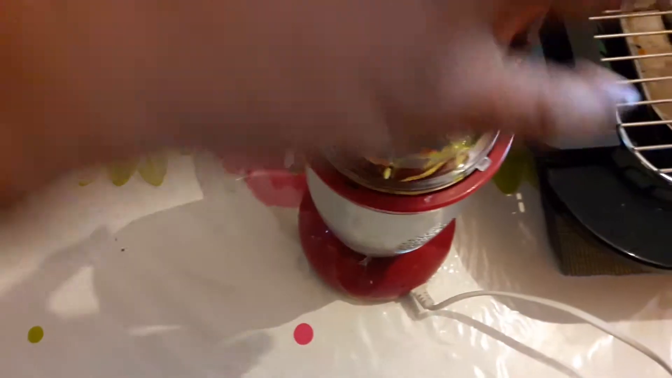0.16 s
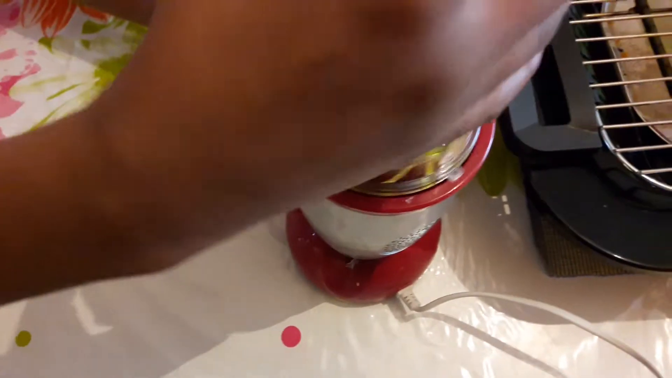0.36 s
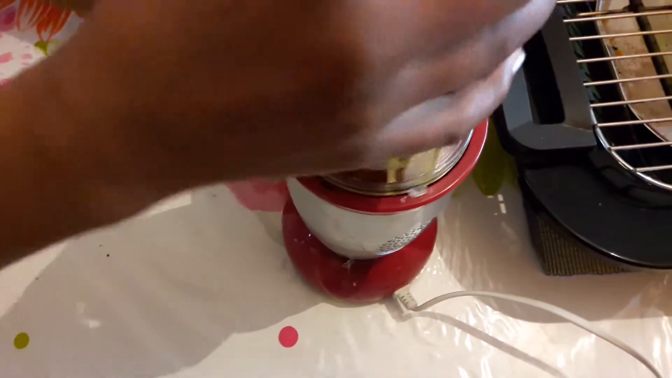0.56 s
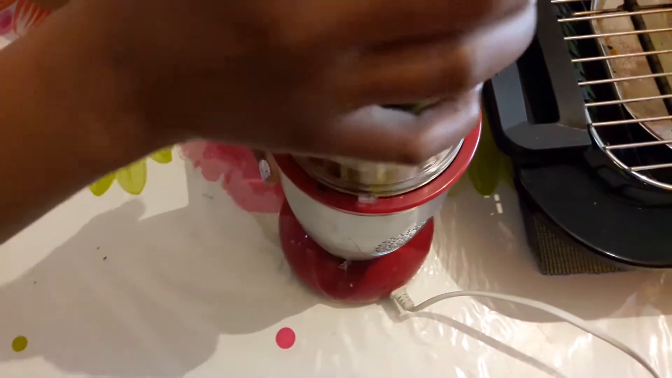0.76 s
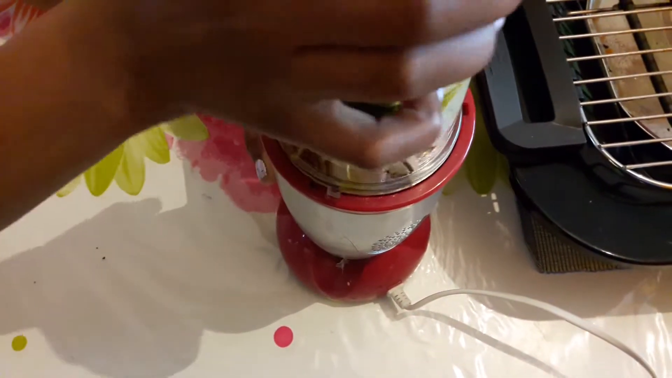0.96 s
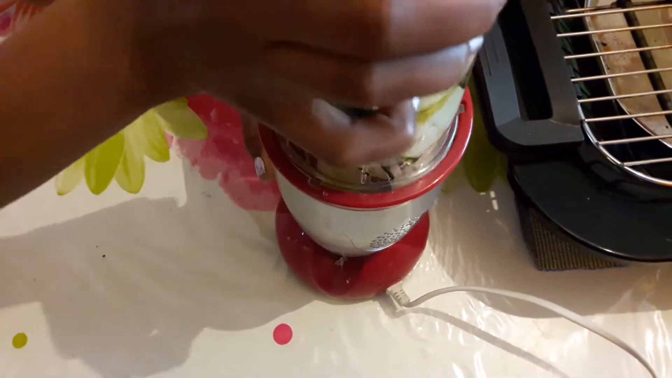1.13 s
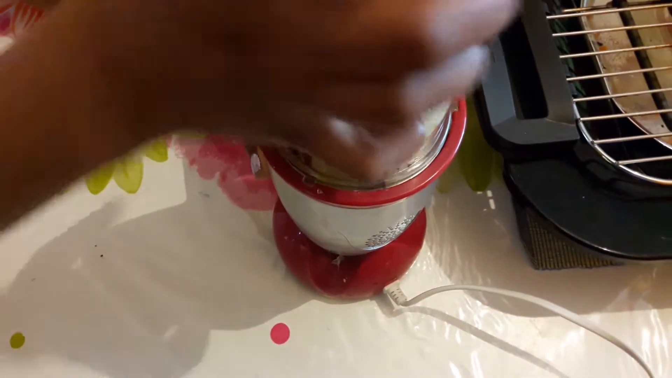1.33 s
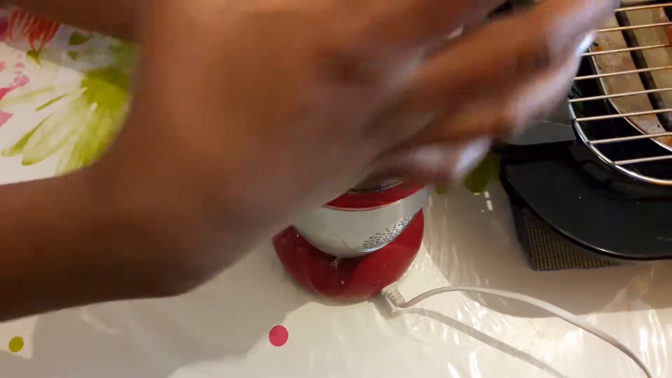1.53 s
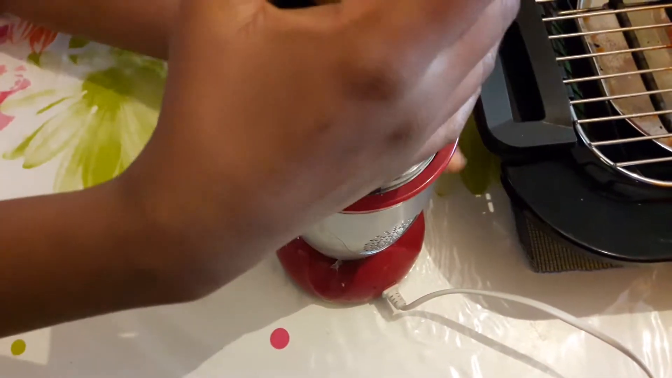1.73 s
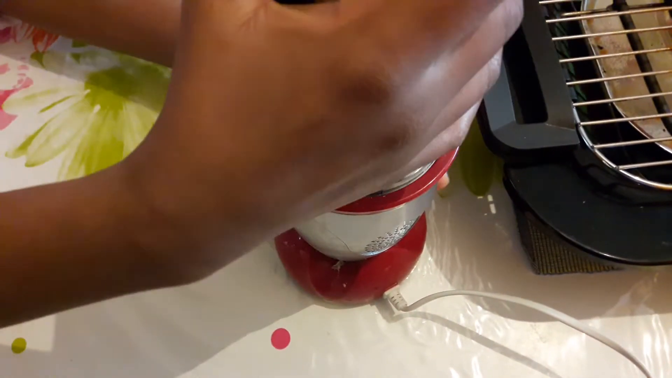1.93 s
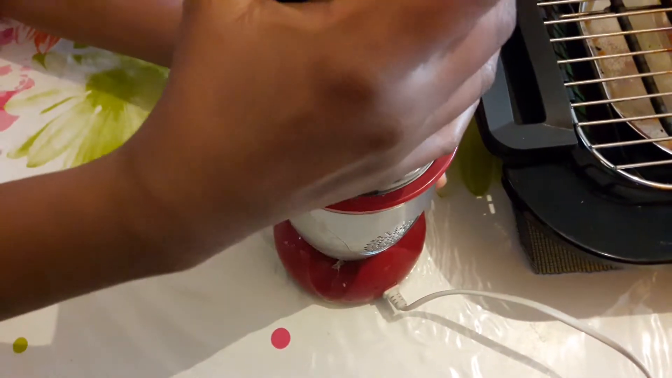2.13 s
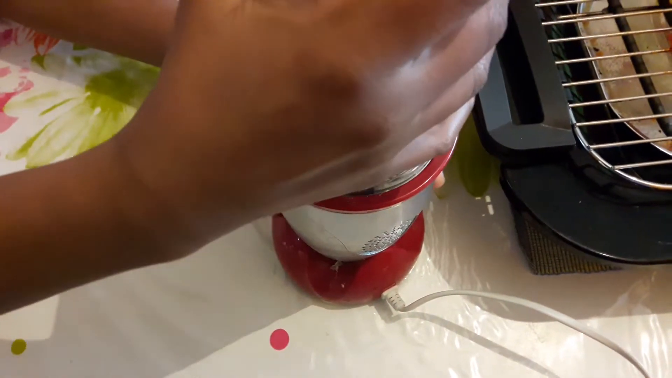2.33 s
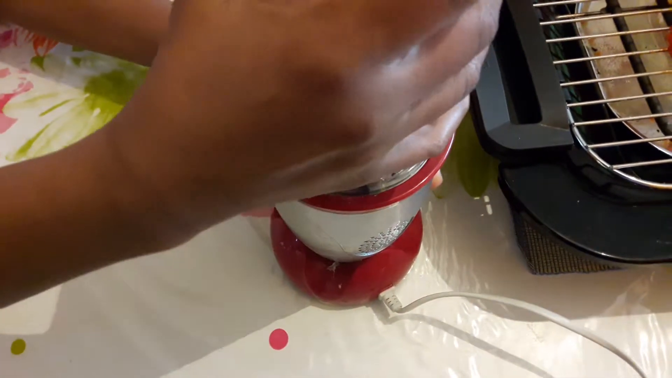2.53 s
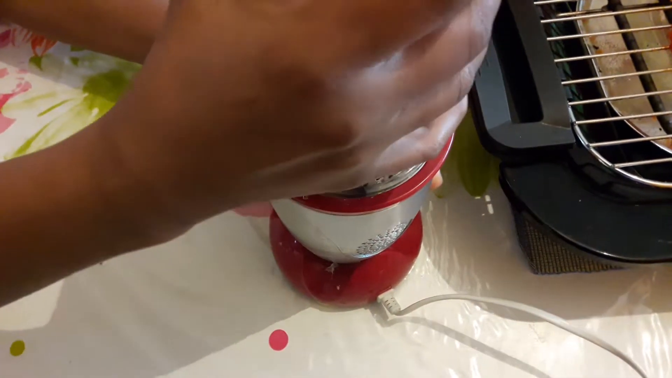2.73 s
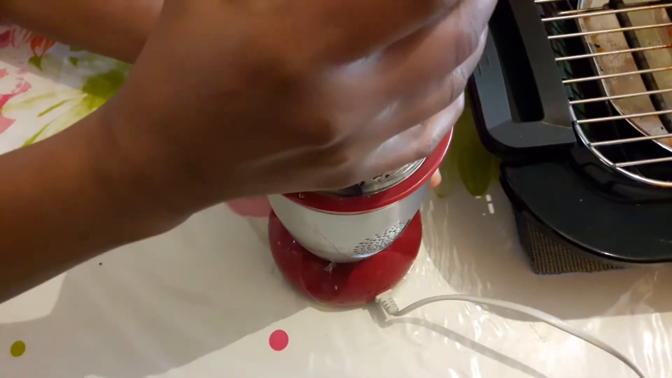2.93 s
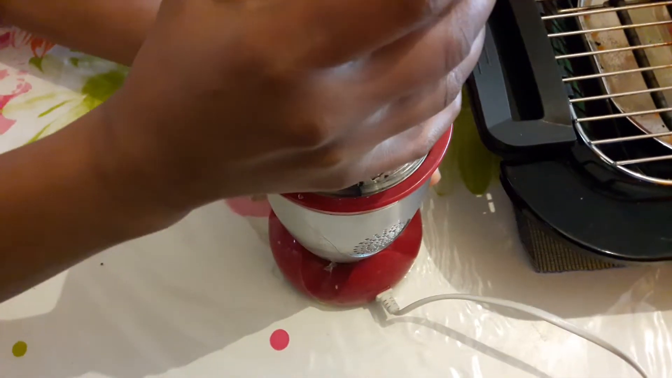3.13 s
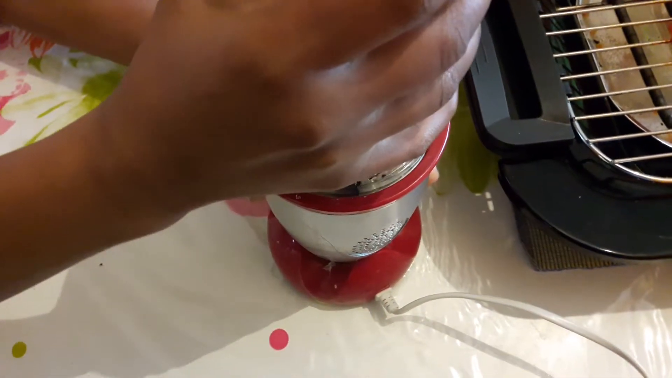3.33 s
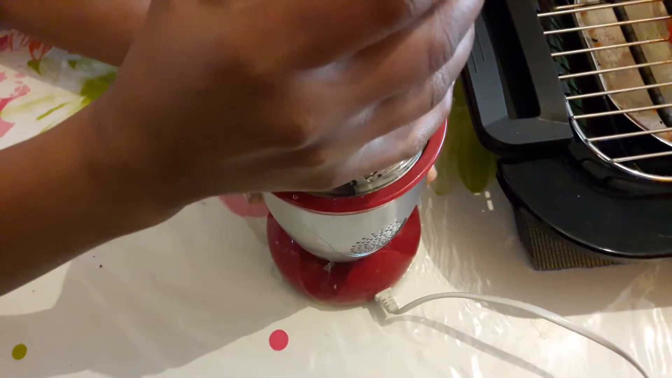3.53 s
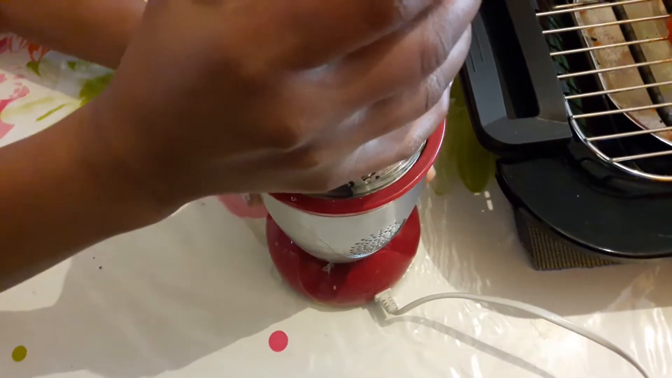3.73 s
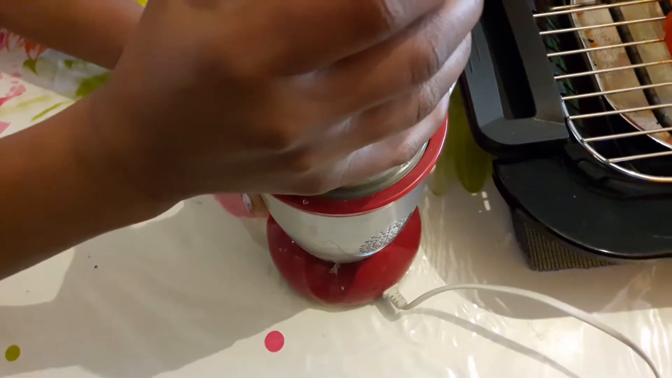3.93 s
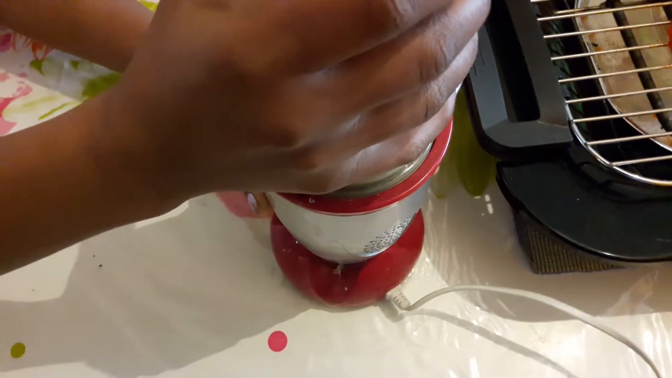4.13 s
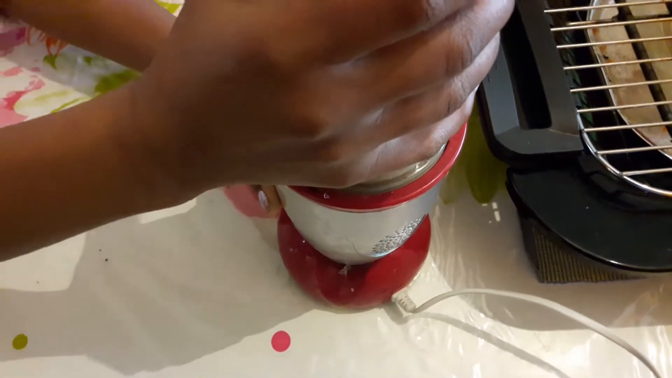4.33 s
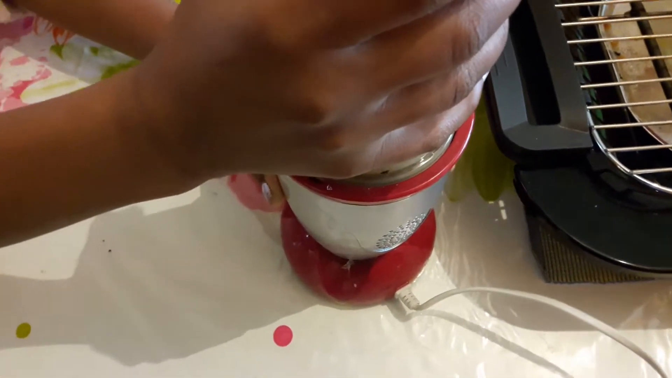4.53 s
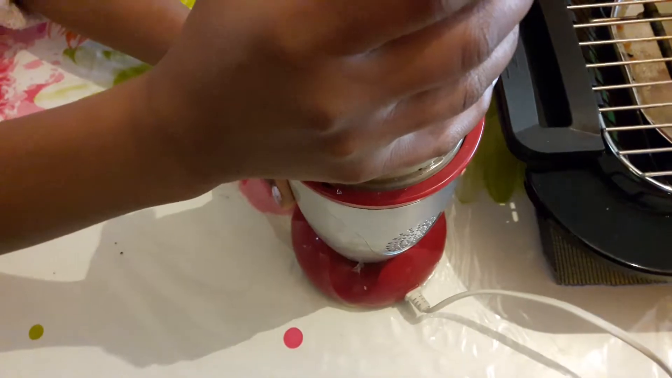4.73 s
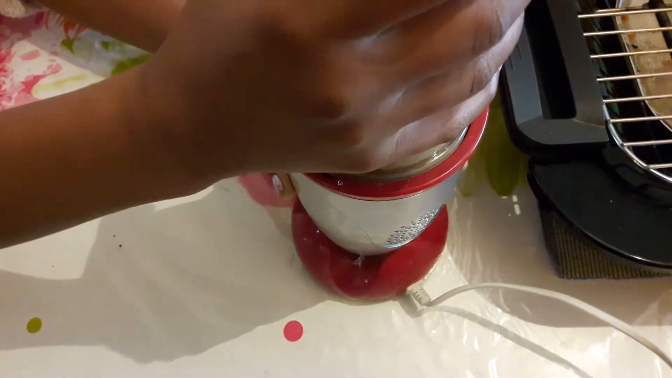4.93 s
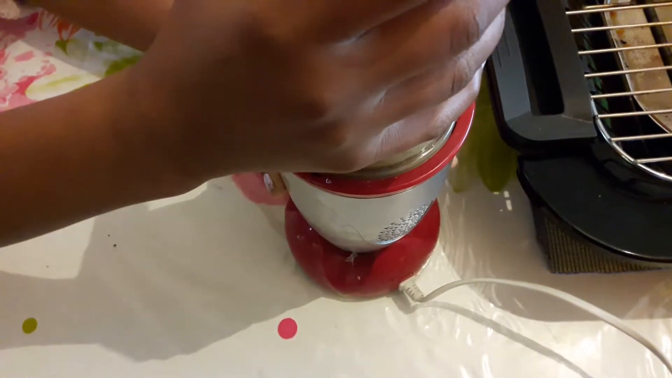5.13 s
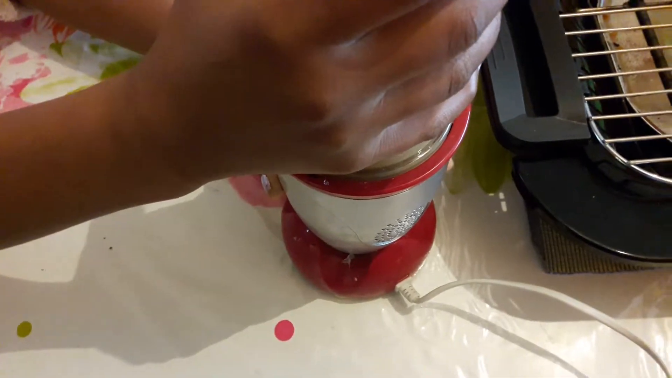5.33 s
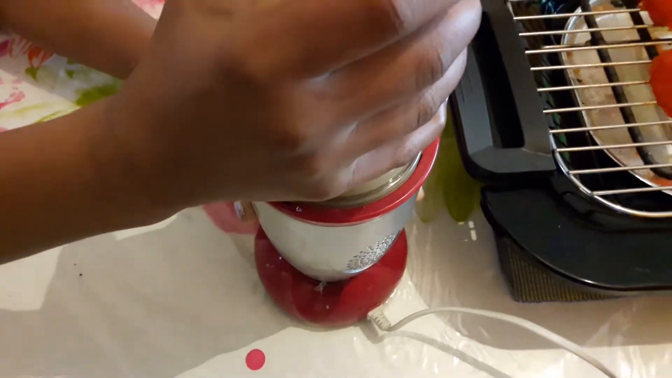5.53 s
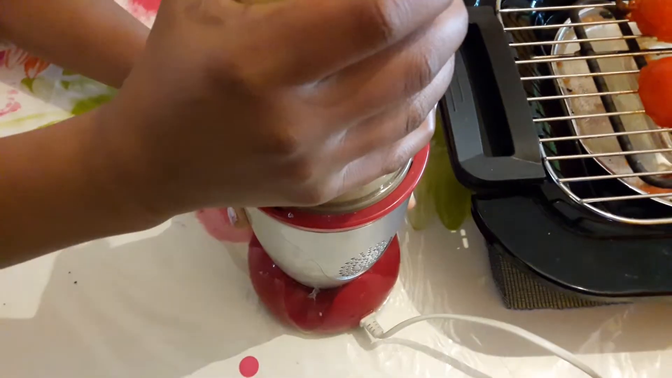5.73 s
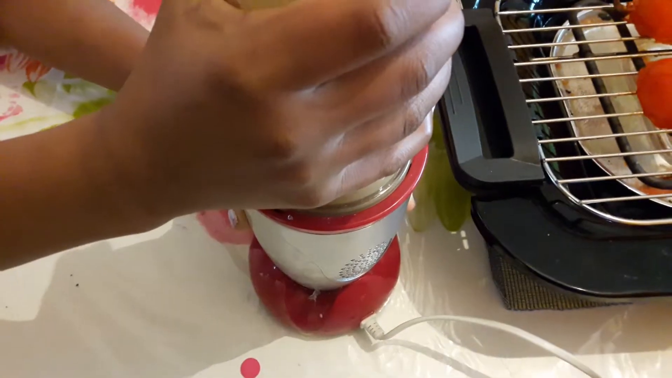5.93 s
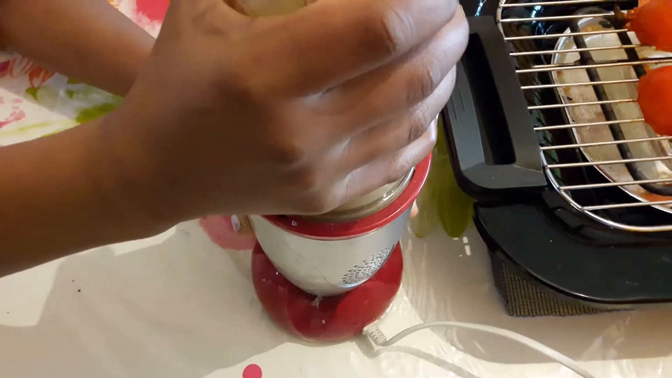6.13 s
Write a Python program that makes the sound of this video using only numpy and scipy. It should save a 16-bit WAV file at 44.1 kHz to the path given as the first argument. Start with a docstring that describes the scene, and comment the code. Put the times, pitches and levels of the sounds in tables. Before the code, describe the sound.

Close up on a kitchen table, a hard plastic cup is knocked and clicked onto a small blender base with low thumps and faint rubbing. After a quieter pause it twists in creaky jerks and snaps loudly into place. A few small clicks follow, then a blink of silence, and the motor fades in over a second to a loud, bright, hissing whir with gurgling food.

```python
"""A small blender runs on a cloth-covered kitchen table, after its plastic cup has been fitted by hand. First
the cup clicks and thumps as it is seated, creaks as it is twisted and snaps into its lock. Each contact is a
short push that rings the cup or the table; the hands add shaped noise. Then the scene changes and the running
blender fades in: food pelts the cup wall and gurgles, as coloured noise that flickers; vents hiss, brushes
whine and the swirling food sings a low wavering tone."""
import sys
import numpy as np
from scipy import signal
from scipy.fft import rfft, irfft, next_fast_len
from scipy.io import wavfile

SR = 44100
rng = np.random.default_rng(int(sys.argv[2]) if len(sys.argv) > 2 else 0)


def waveform_to_disk(signal):
    """Save audio, clipped to [-1, 1], as 16-bit WAV at the path in sys.argv[1]."""
    frames = np.transpose(np.atleast_2d(signal))
    scaled = np.clip(frames, -1, 1) * 32767
    samples = np.round(scaled).astype(np.int16)
    wavfile.write(sys.argv[1], SR, samples)


N = 272535
TIME = np.arange(N) / SR
HZ = np.maximum(np.arange(N // 2 + 1) * SR / N, 1)
CUT_S, RESUME_S = 3.842, 3.878   # the fitting stops, the running starts


def from_db(db):
    """Turn decibels into a gain."""
    return 10 ** (np.asarray(db) / 20)


def rms_one(x):
    """Scale to an rms (average strength) of 1."""
    return x / np.sqrt(np.mean(x ** 2) + 1e-20)


def in_time(rows):
    """Draw straight lines between the rows, giving each column a value at every sample."""
    s, *columns = np.transpose(rows)
    return [np.interp(TIME, s, column) for column in columns]


def at_hz(points, hz):
    """Read a table between its points, along a logarithmic pitch axis."""
    table = np.array(points)
    return np.interp(np.log(hz), np.log(table[:, 0]), table[:, 1])


def drift(rate_hz):
    """Random wandering of rms 1; a higher rate wanders faster."""
    size = next_fast_len(N, real=True)
    hz = np.arange(size // 2 + 1) * SR / size
    smoothed = rfft(rng.standard_normal(size)) / (1 + (hz / rate_hz) ** 2)
    return rms_one(irfft(smoothed, size)[:N])


def cut(x, hz, kind, order=2):
    """Keep one side or one band of the spectrum with a Butterworth filter."""
    return signal.sosfilt(signal.butter(order, hz, kind, fs=SR, output="sos"), x)


def resonate(x, hz, width_hz):
    """Ring one resonance, with gain 1 at its peak."""
    r = np.exp(-np.pi * width_hz / SR)
    top = np.array([1, 0, -1]) * (1 - r * r) / 2
    bottom = [1, -2 * r * np.cos(2 * np.pi * hz / SR), r * r]
    return signal.lfilter(top, bottom, x + 1e-18)


def humps(modes):
    """Gain at each frequency of a set of steep-sided resonances, added as power."""
    power = 0
    for hz, width, db in modes:
        power = power + from_db(db) ** 2 / (1 + ((HZ - hz) / (width * 0.66)) ** 2) ** 2
    return np.sqrt(power)


# How alike the left and right sides are.
# Each row: frequency in Hz, likeness from 0 (unrelated) to 1 (the same).
LIKENESS = [(100, 0.93), (380, 0.91), (700, 0.32), (1300, .1), (15000, .05)]


def spread(gain, flutter=1, likeness=LIKENESS):
    """Stereo noise of a given colour, mixed from a shared middle and an opposed side part; rms 1."""
    mid, side = rfft(rng.standard_normal((2, N)) * flutter)
    alike = np.clip(at_hz(likeness, HZ), 0, .995)
    both = np.sqrt(1 + alike) * mid + np.sqrt(1 - alike) * side * [[1], [-1]]
    return rms_one(irfft(gain * both, N))


def add(track, s, sound):
    """Mix a sound into a track at a time in seconds."""
    start = max(round(s * SR), 0)
    track[..., start:start + sound.shape[-1]] += sound[..., :N - start]


def swells(rows, attack_s, release_s):
    """Gain of overlapping gestures (start, length, dB): each rises, holds and dies away."""
    power = 0
    for s, length, db in rows:
        rise = np.clip((TIME - s) / attack_s, 0, 1)
        fall = np.exp(-np.clip((TIME - s - length) / release_s, 0, 20))
        power = power + (from_db(db) * rise * fall) ** 2
    return np.sqrt(power)


# The hand bears down on the cup.
# Each row: start in seconds, length in seconds, rumble level in dB before the mix.
PUSHES = [(-.02, 0.02, -32.5), (.13, 0.035, -49), (.37, 0.36, -49.5), (.845, 0.059, -39),
          (.89, 0.088, -40.5), (1.195, 0.032, -31.5), (3.28, .05, -41)]
PUSH_ATTACK_S, PUSH_RELEASE_S = 0.0072, 0.039
# The cup slides on its rim while it is seated and while it is twisted.
# Each row: start in seconds, length in seconds, level in dB before the mix.
SLIDES = [(0, 1.31, -58), (2.55, 1.8, -62.5)]
SLIDE_ATTACK_S, SLIDE_RELEASE_S, RESTING_HAND_DB = 0.12, 0.29, -67
# The base shudders after each thud: level in dB against the thud's table entry, rise and dying time.
SHUDDER_DB, SHUDDER_ATTACK_S, SHUDDER_RELEASE_S = -2, .004, .028
# Colour of the shaking base. Each row: frequency in Hz, relative level in dB.
RUMBLE = [(40, -22.5), (75, -26), (95, -4.5), (125, 0.5), (160, 0), (200, -9), (255, -13.5), (315, 2),
          (385, -3), (450, -10.5), (510, -6.5), (620, -19.5), (760, -31), (1500, -40.5)]
# Colour of the cup rubbing on the rim. Each row: frequency in Hz, relative level in dB.
RUBBING = [(410, -30.5), (700, 5), (1800, 6), (1970, 2.5), (2310, 2), (7030, -17.5), (8110, -13.5),
           (9350, -26), (15500, -11)]


def handling(blows, rumble_db, rub_db):
    """The base shakes under each push and after each blow; the cup rubs along the rim."""
    shudders = [(s, 0, thud + SHUDDER_DB) for s, knock, thud, hard in blows]
    pushing = swells(PUSHES, PUSH_ATTACK_S, PUSH_RELEASE_S)
    shuddering = swells(shudders, SHUDDER_ATTACK_S, SHUDDER_RELEASE_S)
    rumble = np.hypot(pushing, shuddering)
    rub = np.hypot(swells(SLIDES, SLIDE_ATTACK_S, SLIDE_RELEASE_S), from_db(RESTING_HAND_DB))
    # rubbing shakes the base a little too
    shake_gain = np.hypot(from_db(rumble_db) * rumble, from_db(-1.5) * rub)
    shake = shake_gain * spread(from_db(at_hz(RUMBLE, HZ)), from_db(2 * drift(22)))
    slide = from_db(rub_db) * rub * spread(from_db(at_hz(RUBBING, HZ)), from_db(drift(30)))
    return shake + slide


# Colour of the quiet background. Each row: frequency in Hz, relative level in dB.
AMBIENCE = [(15, -37.5), (25, -15.5), (33, -15), (107, -8.5), (267, -7.5), (331, -8), (567, -13),
            (1340, -16), (1660, -37.5), (2120, -27), (5140, -27.5), (5880, -34.5), (15500, -35.5)]


def ambience(level_db):
    """A steady, quiet noise lies under the fitting of the cup."""
    return from_db(level_db) * spread(from_db(at_hz(AMBIENCE, HZ)))


# Blows that reach the table. Each row: start in seconds, then levels in dB before the mix
# of the knock, the deep thud and the hard upper knock.
THUMPS = [(0.055, -32.5, -40.5, -44.5), (0.193, -38, -43.5, -48), (0.419, -43, -45, -62),
          (0.557, -36, -53, -53), (0.649, -36, -61, -53), (0.864, -26.5, -45, -66), (1.148, -39, -43, -52),
          (1.204, -19, -53, -42), (1.228, -50, -39, -44), (1.353, -43, -57, -42), (1.685, -40.5, -63, -62),
          (2.326, -50, -78, -56), (3.28, -15.5, -50, -26), (3.311, -44, -50, -25),
          (3.478, -39.5, -48.5, -45.5), (3.625, -38.5, -47, -51), (3.744, -36.5, -41.5, -60)]
# Resonances of the base on the table, from low to high.
# Each row: frequency in Hz, relative level in dB, time in seconds to die away by 60 dB.
TABLE_MODES = [(92.5, -3, 0.25), (121, 0, .18), (153.8, 1, 0.11), (322.6, -6, 0.28), (388.5, 4, 0.059),
               (447.4, -12, 0.15), (523, 3, 0.064), (573, -6.5, 0.22), (632, -8, 0.12)]


def thumps(blows, knock_db, thud_db, hard_db, push_s):
    """Soft pushes ring the table top and the hollow base; hard ones reach its upper modes too."""
    forces, t = np.zeros((3, N)), TIME[:SR // 30]
    push = t * np.exp(-t / push_s)
    push = push / push.sum()
    for s, knock, thud, hard in blows:
        levels = [[thud + thud_db], [knock + knock_db], [hard + hard_db]]
        add(forces, s, from_db(levels) * push)
    out = 0
    for k, (hz, db, t60) in enumerate(TABLE_MODES):
        width = np.log(1000) / np.pi / t60
        force = resonate(forces[k // 3], hz, 0.48 * hz)   # three modes to each register
        # a slow-dying mode is narrow, so it is lifted to ring as strongly at the blow
        out = out + from_db(db) * SR / (2 * np.pi * width) * resonate(force, hz, width)
    return out


# How long the kitchen rings. Each row: frequency in Hz, time in seconds to die away by 60 dB.
KITCHEN_T60 = [(100, 0.13), (500, 0.15), (2000, 0.33), (5000, 0.17), (9000, 0.45), (15000, 0.24)]


def kitchen(x, early_db, early_s, tail_db, bass_db):
    """Quick reflections from table and hand, then the room's tail, dying band by band."""
    t, response = TIME[:SR // 2], 0
    edges = np.geomspace(60, 17000, 11)
    for low, high in zip(edges, edges[1:]):
        hz = np.sqrt(low * high)
        alike = np.clip(at_hz(LIKENESS, hz), 0, 1)
        mid, side = rng.standard_normal((2, len(t)))
        both = np.sqrt(1 + alike) * mid + np.sqrt(1 - alike) * side * [[1], [-1]]
        early = from_db(early_db) * np.exp(-t / early_s)
        tail = from_db(tail_db - 60 * t / at_hz(KITCHEN_T60, hz))
        walls = both * (early + tail) * (t > .001)
        response = response + from_db(bass_db / (1 + (hz / 900) ** 2)) * cut(walls, [low, high], "band")
    return signal.fftconvolve(x, response, axes=1)[:, :N]


def burst(contact_s):
    """A short, evenly bright flurry of slips, different towards each side."""
    envelope = np.exp(-TIME[:SR // 15] / max(contact_s, 1e-4))
    spectrum = rfft(rng.standard_normal((2, len(envelope))) * envelope)
    return irfft(spectrum / np.abs(spectrum), len(envelope)) * np.sqrt(envelope)


# Resonances of the plastic cup held in the hand.
# Each row: frequency in Hz, width in Hz, relative level in dB.
CUP_MODES = [(1408, 720, -4), (1790, 240, 5.5), (2196, 260, -4.5), (2740, 210, 2), (3480, 1200, -6.5),
             (3900, 270, 4), (4640, 710, -4.5), (6040, 460, 0.5), (8140, 670, -8.5), (11900, 1200, -1.5),
             (14700, 770, -21)]


def cup_rings(force, crack_db):
    """The cup's modes plus the bare crack of the contact; so small a shell radiates little bass."""
    out = from_db(crack_db) * force
    for k, (hz, width, db) in enumerate(CUP_MODES):
        out = out + (-1) ** k * from_db(db) * resonate(force, hz, width)
    return cut(out, 1100, "high", order=3)


# The cup knocks against the base. Each row: start in seconds, then levels in dB before the mix
# of the click (middle band), the clack below it and the tick above it,
# then the frequency in Hz of an added ring, its gain in dB, and the contact's fading time in seconds.
CLICKS = [(0.4139, -50, -64, -68.5, 1770, 0, .0012), (0.4391, -17.5, -43.5, -36.5, 3200, -6, 0.00071),
          (0.4945, -15, -30, -27, 3880, -7, 0.0048), (0.5203, -7, -29, -31.5, 3830, 21, 0.0016),
          (0.7612, -19, -43, -38.5, 3800, -4, 0.0047), (0.8294, -27.5, -44, -50, 3660, 12, 0.0021),
          (1.003, -23.5, -39, -39.5, 3800, 3, 0.0017), (1.0149, -22, -52, -37, 3720, -9, 0.0035),
          (1.1386, -32, -50.5, -45.5, 3970, -1, 0.0048), (1.2006, -45, -36.5, -71, 1860, -6, 0.0015),
          (1.231, -33.5, -45.5, -53, 1890, -3, 0.0034), (1.3764, -44.5, -54, -58, 1410, -2, 0.0018),
          (1.724, -47, -53.5, -63, 1760, 3, 0.0025), (3.2809, -13, -20.5, -35.5, 3050, -1, 0.0031),
          (3.3105, -18.5, -28, -33, 2170, -2, 0.0029), (3.5085, -34.5, -46, -35.5, 8500, -6, 0.0088),
          (3.5386, -32.5, -44, -52, 2230, 3, 0.0037), (3.677, -29.5, -62, -38.5, 6300, 3, 0.0019),
          (3.744, -34.5, -45, -46.5, 2062, -6, 0.013)]
CLACK_TOP_HZ, CLICK_TOP_HZ = 3000, 7000


def clicks(contacts, clack_db, click_db, tick_db, ring_width_hz):
    """Each contact rings the cup; where it lands decides which modes answer most."""
    out = np.zeros((2, N))
    for s, click, clack, tick, hz, ring_db, contact_s in contacts:
        ring = cup_rings(burst(contact_s), crack_db=-11.5)
        ring = ring + from_db(ring_db) * resonate(ring, hz, ring_width_hz)
        low = cut(ring, CLACK_TOP_HZ, "low", order=4)
        middle = cut(ring, [CLACK_TOP_HZ, CLICK_TOP_HZ], "band", order=3)
        high = cut(ring, CLICK_TOP_HZ, "high", order=4)
        sound = from_db(clack + clack_db) * rms_one(low)
        sound = sound + from_db(click + click_db) * rms_one(middle)
        sound = sound + from_db(tick + tick_db) * rms_one(high)
        add(out, s, sound)
    return out


# Fingers squeak off the cup. Each row: time in seconds, centre pitch in Hz, level in dB.
SQUEAK = [(1.35, 600, -85), (1.357, 728, -48.5), (1.377, 1290, -54), (1.392, 1450, -54.5),
          (1.42, 1270, -66), (1.46, 1200, -88)]


def squeak(rasp_db):
    """Skin drags briefly over plastic: a rough gliding tone with a rasp around it."""
    hz, db = in_time(SQUEAK)
    tone = np.sin(2 * np.pi * np.cumsum(hz * (1 + .16 * drift(300))) / SR)
    rasp = from_db(rasp_db) * spread(humps([(1330, 1500, 0)]))
    return from_db(db) * (tone + rasp)


# The cup is twisted into its lock and gives way in jerks.
# Each row: start in seconds, strength in dB.
JERKS = [(2.52, -11), (2.588, -5.5), (2.622, -11), (2.694, -15), (2.725, -1), (2.801, -2.5), (2.832, 1),
         (2.885, -2.5), (2.898, -1.5), (2.950, 4.5), (2.969, 1), (3.004, 1), (3.085, 0.8), (3.119, 2.4),
         (3.136, -3.5), (3.198, -9.5), (3.216, 1.5)]
# Levels before the mix of a jerk of 0 dB, in the cup and in the table.
JERK_CLICK_DB, JERK_CLACK_DB, JERK_TICK_DB = -44.5, -50, -64.5
JERK_KNOCK_DB, JERK_THUD_DB, JERK_HARD_DB = -40.5, -42.5, -54
JERK_RING_HZ, JERK_RING_DB, JERK_CONTACT_S = 2350, -1.5, 0.0011
CUP_FOLLOWS, TABLE_FOLLOWS = 0.55, 1.4   # dB of sound per dB of strength


def jerks():
    """Each jerk of the twist is a small click in the cup and a small blow on the table."""
    in_cup, on_table = [], []
    for s, db in JERKS:
        cup = np.array([JERK_CLICK_DB, JERK_CLACK_DB, JERK_TICK_DB]) + CUP_FOLLOWS * db
        table = np.array([JERK_KNOCK_DB, JERK_THUD_DB, JERK_HARD_DB]) + TABLE_FOLLOWS * db
        in_cup.append((s, *cup, JERK_RING_HZ, JERK_RING_DB, JERK_CONTACT_S))
        on_table.append((s, *table))
    return in_cup, on_table


# The lock starts to creak, builds up, and stays at its full level.
TWIST_S, TWIST_BUILD_S, CREAK_DB = 2.55, 0.41, -65


def creak(hz, width_hz, cup_db):
    """The lock sticks and slips at uneven intervals, each slip a tiny high tick."""
    times = np.cumsum(rng.gamma(2, .009, size=500))   # 18 ms apart on average
    at = (times[times < CUT_S] * SR).astype(int)
    signs = rng.choice([-1, 1], (len(at), 2))
    strengths = from_db(rng.normal(0, 3, (len(at), 2)))
    slips = np.zeros((2, N))
    slips[:, at] = (signs * strengths).T
    ticks = resonate(resonate(slips, hz, width_hz), hz, width_hz)
    ticks = ticks + from_db(cup_db) * cup_rings(cut(slips, 3000, "low"), crack_db=-5.5)
    build = np.clip((TIME - TWIST_S) / TWIST_BUILD_S, 0, 1)
    return from_db(CREAK_DB) * build * rms_one(ticks)


# The fade-in: moment of full level, steepness, and how the slope eases towards the top.
FULL_S, FADE_DB_PER_S, FADE_POWER = 4.8825, 61.5, 1.063
# How much food the blade meets. Each row: time in seconds, level in dB against the steady churn.
LOAD = [(3.88, -8.5), (4.23, -16), (4.28, -5.5), (4.37, -10.5), (4.5, -6.5), (4.85, 0.5), (5.28, -1.5),
        (5.55, 0.5), (6.18, -.5)]
# The blade meets an air pocket and the churning dips. Each row: time in seconds, dip in dB.
AIR_POCKETS = [(4.957, -2.5), (5.312, -3.5), (5.47, -2.5)]
POCKET_S = 0.019   # half the length of a dip


def running_levels():
    """Levels in dB: the air follows the fade-in; the churn also follows the load on the blade."""
    air = -FADE_DB_PER_S * np.maximum(FULL_S - TIME, 0) ** FADE_POWER
    load, = in_time(LOAD)
    pockets = sum(db * np.exp(-((TIME - s) / POCKET_S) ** 2) for s, db in AIR_POCKETS)
    return air + load + pockets, air


# A faint hum at the start of the run. Each row: time in seconds, level in dB around which it wavers.
HUM = [(3.88, -100), (3.95, -93), (4.2, -89), (4.4, -83), (4.5, -84), (4.7, -100)]


def motor_hum():
    """A faint 500 Hz tone whose level wavers."""
    db, = in_time(HUM)
    return from_db(db + 1.7 * drift(16)) * np.sin(2 * np.pi * 500 * TIME)


# A low tone from the swirling food, sagging as the load thickens. Each row: time in seconds, centre pitch in
# Hz, rms level in dB.
FOOD_TONE = [(3.88, 762, -104), (4.12, 844, -97.5), (4.2, 765, -96.5), (4.42, 795, -87), (4.54, 780, -65),
             (4.66, 630, -62), (4.78, 580, -58), (5.15, 633, -54), (5.6, 590, -62), (5.71, 479, -44.5),
             (5.87, 518, -56.5), (6.07, 462, -47), (6.18, 501, -48)]


def food_tone(churn):
    """The swirling food sings a faint low tone; the stronger the churn, the more its pitch shakes."""
    hz, db = in_time(FOOD_TONE)
    shake = 0.0181 + 0.0503 * from_db(churn)
    phase = 2 * np.pi * np.cumsum(hz * (1 + shake * drift(50.96))) / SR
    return from_db(db) * np.sqrt(2) * np.sin(phase)


# How alike the motor sounds on the left and right.
# Each row: frequency in Hz, likeness from 0 (unrelated) to 1 (the same).
MOTOR_LIKENESS = [(100, 1), (500, 0.96), (1900, 1), (3200, 0.83), (4300, 0.22), (5300, 0.74), (7200, 0.28),
                  (9200, 0.65), (11100, 0.47), (12200, 0.18), (15000, 0.42)]
# Resonances of the filled cup and the motor housing.
# Each row: frequency in Hz, width setting in Hz, relative level in dB.
JAR_MODES = [(1100, 31, -19.5), (1350, 59, -26), (1577, 115, -3), (1720, 100, -4), (1862, 120, -3),
             (2018, 140, 2), (2384, 83, -1.5), (2606, 90, 2), (2804, 72, 1), (2950, 54, 4), (3143, 137, -1),
             (3350, 47, 0.5), (3969, 180, -7.5), (5390, 280, -8)]


def food_on_wall(churn, load_drift, churn_db, housing_db):
    """Food hits the cup wall in uneven handfuls, over a faint steady housing noise."""
    # between two wall modes the cup barely radiates
    wall = humps(JAR_MODES) * (1 - 0.75 * humps([(2193, 55, 0)]))
    level = np.hypot(from_db(churn + churn_db), from_db(housing_db))
    return level * spread(wall, from_db(load_drift + 0.8 * drift(700)), MOTOR_LIKENESS)


# Resonances of the air space above the liquid.
# Each row: frequency in Hz, width setting in Hz, relative level in dB.
GURGLE_MODES = [(342, 150, -31), (494, 41, -9), (606, 69, 1), (772.4, 39, 4), (875, 104, -7)]


def gurgle(churn, level_db):
    """The air above the churning liquid resonates in uneven surges."""
    surges = from_db(2.7 * drift(44))
    return from_db(churn + level_db) * spread(humps(GURGLE_MODES), surges, MOTOR_LIKENESS)


def swirl(x, depth_db):
    """Food sliding over the wall lets each register swell and sink on its own."""
    edges = np.array([0, 3500, 5000, 7000, 10000, 13000, SR])
    spectrum, out = rfft(x), 0
    for low, high in zip(edges, edges[1:]):
        band = irfft(spectrum * (HZ >= low) * (HZ < high), N)
        out = out + band * from_db(depth_db * drift(19.0))
    return out


# Colour of the hiss from the vents. Each row: frequency in Hz, relative level in dB.
HISS = [(30, -21.5), (200, -34), (420, -28.5), (1200, -17), (2250, -33.5), (3500, -4.5), (4800, -1.5),
        (5400, 1.5), (6400, 2.5), (7600, -0.5), (9600, 6), (10600, 5), (12300, -1), (15500, 7.5)]


def vent_hiss(air, load_drift, level_db):
    """Air rushes through the vents as noise that flickers, partly in step with the food."""
    flicker = from_db(0.55 * load_drift + 1.83 * drift(500))
    hiss = from_db(air + level_db) * spread(from_db(at_hz(HISS, HZ)), flicker, MOTOR_LIKENESS)
    return swirl(hiss, depth_db=.8)


# Brush whine and high housing resonances.
# Each row: frequency in Hz, width setting in Hz, relative level in dB.
WHINE = [(8915, 70, -14), (9322, 60, -12), (9522, 70, -11), (10379, 50, -12), (10692, 45, -8),
         (10922, 50, -2), (11085, 50, 2), (11230, 170, -3), (11080, 800, -5), (15354, 70, -7)]


def brush_whine(air, level_db):
    """The brushes whine: narrow bands of noise whose strength wavers."""
    return from_db(air + level_db) * spread(humps(WHINE), from_db(1.9 * drift(32)), MOTOR_LIKENESS)


# Level balance of the motor. Each row: frequency in Hz, left minus right in dB.
BALANCE = [(100, -0.5), (10000, 0.1), (11800, 1), (13500, 3.5), (15500, 7)]
# Phase lead of the motor. Each row: frequency in Hz, radians by which left leads right.
LEAD = [(100, -0.13), (3000, 0.088), (6000, -0.51), (10500, -0.61), (14000, 0.038), (15500, -.4)]


def blender(churn_db, housing_db, gurgle_db, hiss_db, whine_db):
    """Sum the running sounds; the motor stands off centre and reaches the two sides unequally."""
    churn, air = running_levels()
    load_drift = drift(30)
    sounds = motor_hum() + food_tone(churn)
    sounds = sounds + food_on_wall(churn, load_drift, churn_db, housing_db)
    sounds = sounds + gurgle(churn, gurgle_db) + brush_whine(air, whine_db)
    hiss = vent_hiss(air, load_drift, hiss_db)
    # wall echoes comb the hiss into fine peaks and dips
    echoes = rfft(rng.standard_normal((2, SR // 40)), N).real
    comb = from_db(1.2 * rms_one(echoes))
    # each side takes half of the difference in level and phase
    half = from_db(at_hz(BALANCE, HZ) / 2) * np.exp(.5j * at_hz(LEAD, HZ))
    return irfft((rfft(hiss) * comb + rfft(sounds)) * np.array([half, 1 / half]), N)


def scene():
    """The cup is fitted; the scene changes; the blender runs."""
    jerk_clicks, jerk_blows = jerks()
    blows = [*THUMPS, *jerk_blows]
    contacts = [*CLICKS, *jerk_clicks]
    hits = thumps(blows, knock_db=-2.5, thud_db=-3.5, hard_db=1.5, push_s=0.00021)
    hits = hits + clicks(contacts, clack_db=-12.5, click_db=-23.5, tick_db=-14, ring_width_hz=380)
    hits = hits + creak(hz=5200, width_hz=770, cup_db=2.5)
    room = kitchen(hits, early_db=-42.0, early_s=0.0012, tail_db=-35.5, bass_db=-1.0)
    hands = handling(blows, rumble_db=-2.5, rub_db=0.5) + squeak(rasp_db=1.5)
    fitting = hits + room + ambience(level_db=-62.5) + hands
    running = blender(churn_db=-24.0, housing_db=-85, gurgle_db=-42, hiss_db=-17.5, whine_db=-23.0)
    return fitting * (TIME < CUT_S) + running * (TIME > RESUME_S)


CUTOFF_HZ = 15780


def record(dry):
    """The microphones shed the deepest bass; the top is cut steeply."""
    steep = signal.ellip(12, .1, 70, CUTOFF_HZ, fs=SR, output="sos")
    return signal.sosfilt(steep, cut(dry, 22, "high"))


dry = scene()
out = record(dry)
waveform_to_disk(out)
```